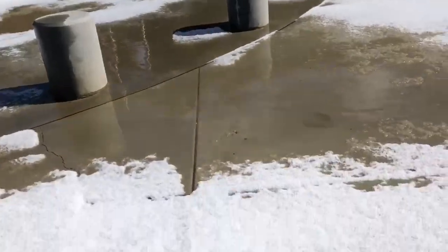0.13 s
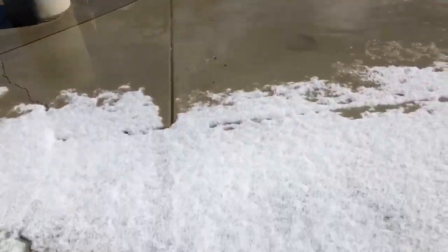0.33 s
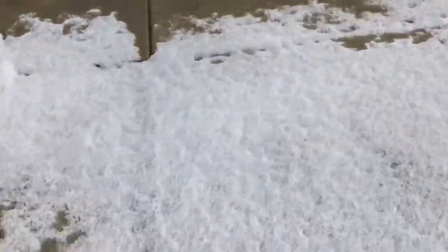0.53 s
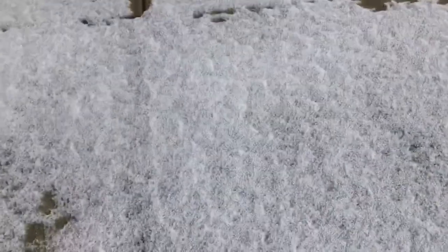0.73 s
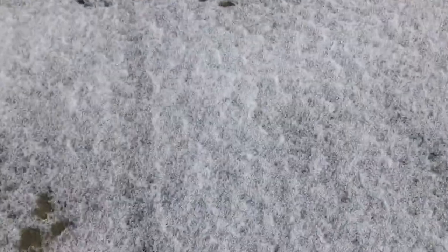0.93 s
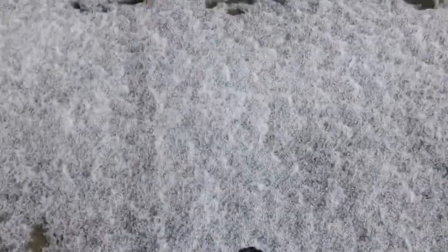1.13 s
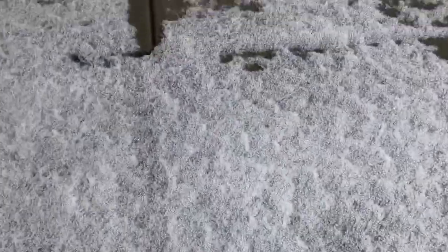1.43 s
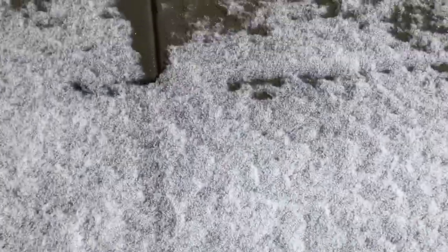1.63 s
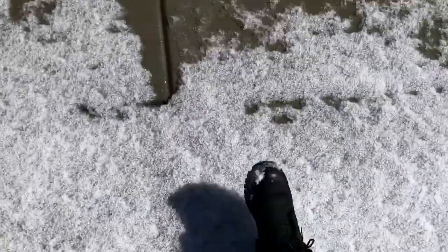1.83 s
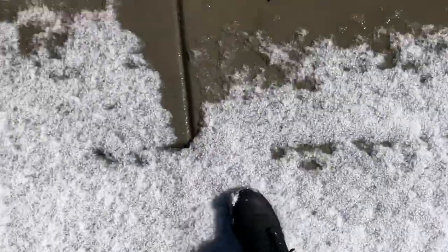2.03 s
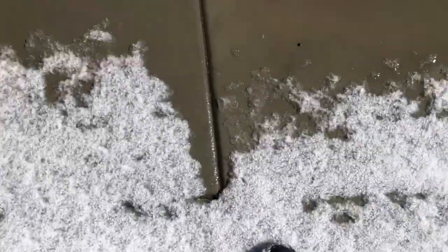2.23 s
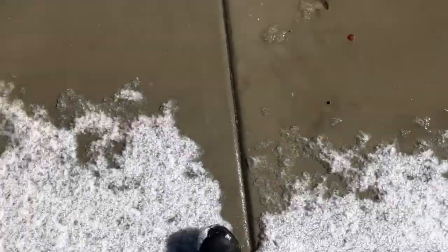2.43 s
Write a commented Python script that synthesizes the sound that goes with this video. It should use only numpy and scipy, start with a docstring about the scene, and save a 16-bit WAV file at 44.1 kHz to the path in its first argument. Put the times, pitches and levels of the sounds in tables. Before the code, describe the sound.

Boots take a few close steps through thin, wet slush on outdoor paving, crunching and splatting with tiny pops and drips. Low wind gusts buffet the hand-held microphone through the first half, then ease off.

```python
"""Wind rumbles on a hand-held microphone as boots crunch through thin, wet slush on paving, close by.
Each step crushes ice grains and squeezes out splats of water and air; air pockets pop and drops tick
down after it. A rubber sole squeaks at the start, and heels knock on the paving near the end.
The gusts buffet the microphone hardest in the first half, over a faint outdoor background."""
import sys
import numpy as np
from scipy import signal
from scipy.fft import rfft, irfft, next_fast_len
from scipy.io import wavfile
from scipy.ndimage import uniform_filter1d

SR = 44100
rng = np.random.default_rng(int(sys.argv[2]) if len(sys.argv) > 2 else 0)


def dump_mix(stems):
    """Bounce the given channels to the path in sys.argv[1] as a 16-bit WAV at rate SR."""
    frames = np.atleast_2d(stems).T  # one column per channel
    limited = np.clip(frames, -1, 1)  # hard clip at full scale
    pcm = np.round(limited * 32767).astype(np.int16)
    wavfile.write(sys.argv[1], SR, pcm)


N = 114660
T = np.arange(N) / SR
LOW_CUT_HZ, HIGH_CUT_HZ = 34, 16200

# Wind strength at the microphone. Each row: time in seconds, level in dB.
GUST_CURVE = [(0, -39), (.05, -37.5), (.078, -53.5), (.125, -32.5), (.2, -31.5), (.27, -37), (.3, -35.5),
              (.335, -51.5), (.372, -25.5), (.43, -28.5), (.455, -31), (.49, -28.5), (.53, -33.5),
              (.575, -29.5), (.635, -35.5), (.71, -29.5), (.77, -38), (.803, -38), (.83, -29.5), (.88, -35),
              (.945, -30.5), (1.05, -33), (1.14, -39), (1.19, -44.5), (1.218, -71), (1.243, -50.5),
              (1.28, -54), (1.36, -69), (1.42, -50), (1.47, -50.5), (1.505, -64.5), (1.55, -45.5),
              (1.605, -71), (1.645, -52), (1.705, -49.5), (1.735, -59), (1.95, -65.5), (2.03, -58),
              (2.07, -46), (2.16, -45), (2.23, -44.5), (2.28, -37.5), (2.335, -50), (2.38, -44),
              (2.405, -53.5), (2.435, -46), (2.52, -64), (2.6, -55)]
# Tone of the wind's rumble and of its small eddies. Each row: frequency in Hz, relative level in dB.
RUMBLE_SPECTRUM = [(20, -31), (35, -26), (55, -1.5), (75, 1.5), (110, -2.5), (170, -6.5), (240, -11.5),
                   (420, -37), (800, -57.5), (2000, -100)]
EDDY_SPECTRUM = [(60, 0), (160, -14), (260, 4.5), (360, 4), (480, 2.5), (620, -8), (850, -25),
                 (1300, -36.5), (3000, -59)]
# Flurries of small eddies. Each row: start in seconds, end in seconds, level in dB.
EDDY_FLURRIES = [(0.105, .122, -35), (0.16, 0.192, -47.5), (0.235, 0.253, -49), (0.285, 0.288, -42),
                 (0.346, .36, -41), (0.364, 0.406, -36), (0.418, 0.435, -39.5), (0.45, 0.476, -31.5),
                 (0.49, 0.499, -27), (0.574, 0.586, -35), (0.623, 0.636, -43.5), (.697, 0.714, -32.5),
                 (0.776, 0.778, -38.5), (0.805, 0.813, -36.5), (.837, 0.856, -36), (0.893, 0.951, -41.5),
                 (0.996, 0.999, -43.5), (1.026, 1.036, -41), (1.065, 1.083, -37), (2.313, 2.292, -61),
                 (2.366, 2.367, -55)]
# Single eddies hitting the microphone. Each row: start in seconds, level in dB, starting pitch in Hz.
EDDY_HITS = [(.115, -36, 385), (.135, -25.5, 393), (.152, -35.5, 480), (.171, -38, 362), (.219, -36, 324),
             (.374, -24, 350), (.402, -28.5, 397), (.430, -15, 168), (.493, -16.5, 464), (.503, -39.5, 101),
             (.548, -13, 418), (.564, -19, 111), (.632, -32.5, 430), (.746, -20.5, 473), (.753, -19.5, 138),
             (.841, -20.5, 390), (.857, -17.5, 315), (.935, -24, 267), (.984, -26.5, 250),
             (1.136, -22.5, 102), (2.150, -33, 253), (2.164, -30.5, 128), (2.305, -34, 269),
             (2.368, -33, 146)]
# Slush crushed under the sole or settling behind it.
# Each row: start in seconds, end in seconds, crunch level in dB, fizz level in dB.
CRUSHES = [(-.05, 0.079, -60.5, -62.5), (0.548, 0.747, -56.5, -60), (1.233, 1.41, -60, -62.5),
           (1.473, 1.585, -65.5, -69), (1.874, 1.903, -58, -59.5), (1.905, 1.98, -94, -68),
           (2.019, 2.18, -55, -59.5), (2.223, 2.446, -71, -76.5)]
# Tone of the squelch and of the spray, heard close. Each row: frequency in Hz, relative level in dB.
SQUELCH_SPECTRUM = [(100, 8.5), (300, 4.5), (750, 2), (1100, 2.5), (1500, 2.5), (2300, 0), (3200, -0.5),
                    (5000, -4.5), (8000, -47), (16000, -92)]
SPRAY_SPECTRUM = [(500, -23), (1500, -32), (3000, -4.5), (5000, -2), (7500, 0), (11000, -6), (13000, -6),
                  (15500, -5.5)]
# Tone of the open air around the walker. Each row: frequency in Hz, relative level in dB.
OUTDOOR_SPECTRUM = [(25, -12), (60, -5.5), (150, -9.5), (400, -3), (1000, -9), (2000, -16), (4000, -21),
                    (8000, -27.5), (16000, -31.5)]
# Wet rubber squeaking. Each row: start in seconds, end in seconds, level in dB, pitch in Hz.
SOLE_SQUEAKS = [(.024, .043, -63, 10400), (.012, .02, -66, 4950), (.055, .078, -63, 4980),
                (.045, .06, -68, 8600)]
# Slush bursting from under the boot. Each row: peak time, rise and fall in seconds, squelch level in dB,
# air pocket pitch in Hz, its ring in dB over the squelch, spray level in dB, mist in dB over the spray.
SLUSH_SPLATS = [(0.021, 0.017, 0.0045, -52, 1240, 17, -64, 3),
                (.048, 0.0042, 0.0037, -39, 1700, 9, -51.5, -6),
                (0.526, 0.00085, 0.0047, -70, 2530, -4, -45.5, 0.5),
                (0.554, 0.0043, 0.00071, -64, 1480, 0, -43.5, 5),
                (.567, 0.0069, 0.011, -50.5, 2750, 0, -45, -3),
                (0.629, 0.00083, 0.0044, -52, 1200, 5, -49.5, -12),
                (.652, 0.0084, 0.024, -48.5, 1120, 0, -73, 5),
                (.700, 0.017, 0.012, -42.5, 1950, -4, -50, -17),
                (0.713, 0.0044, 0.0017, -54, 3320, 0, -46.5, -16),
                (1.109, 0.0015, 0.0042, -46, 1390, 12, -63, -11),
                (1.116, .001, .002, -60, 1490, 0, -47.5, -2),
                (1.245, 0.0023, 0.0085, -50.5, 3260, 10, -59, 3),
                (1.272, 0.0031, 0.0048, -47, 3000, -9, -50, -9),
                (1.281, 0.0023, 0.0021, -42, 1720, -8, -53, -15),
                (1.302, 0.0048, 0.0058, -43, 556, 1, -70, -6), (1.366, 0.014, 0.014, -48, 1250, 3, -59, -8),
                (1.398, 0.015, .009, -51, 1340, 6, -59, -6),
                (1.424, 0.011, 0.012, -37.5, 1110, -2.5, -45.5, -15),
                (1.468, 0.0074, .007, -49.5, 2520, -15, -67, 0),
                (1.535, 0.041, 0.04, -60.5, 1430, 22, -68, -17),
                (1.8838, 0.00036, 0.0057, -36, 1450, 11, -36.5, -7),
                (1.996, 0.0069, 0.017, -45.5, 2480, -4.5, -45, -12),
                (2.1, .002, 0.0032, -51, 2000, -8, -50, -9),
                (2.127, 0.0051, 0.008, -35, 1310, -9.5, -46.5, -7),
                (2.582, 0.00077, 0.0055, -34.5, 1160, 1, -43.5, -13)]
# Flung drops landing. Each row: time in seconds, level in dB, pitch in Hz.
DROP_LANDINGS = [(.168, -50, 5800), (.671, -39, 8300), (.707, -38, 7750), (.716, -33, 6900),
                 (.731, -48, 5600), (.795, -54, 8000), (.889, -40, 13400), (1.018, -49, 11500),
                 (1.022, -46.5, 12500), (1.133, -48, 10200), (2.2, -50, 2080), (1.674, -54, 14000),
                 (2.431, -51, 13500)]
# Air pockets popping under the boot. Each row: peak time in seconds, level in dB, pitch in Hz.
BUBBLE_POPS = [(0.648, -40, 2580), (.671, -43, 2980), (.687, -31.5, 2240), (.698, -23.5, 1640),
               (.701, -36, 3030), (1.118, -25.5, 427), (1.424, -39, 1070), (1.8845, -65, 1390),
               (1.886, -23, 3040), (1.887, -23, 4650), (1.8855, -26, 6140), (2.125, -42, 1160),
               (2.586, -49, 1270)]
# Heels meeting the paving. Each row: start in seconds, level in dB, starting pitch in Hz.
HEEL_STRIKES = [(1.889, -36.5, 404), (2.129, -52, 410), (2.588, -41, 385)]


def from_db(db):
    """Decibels to gain."""
    return 10 ** (np.asarray(db) / 20)


def unit_rms(x):
    """Scale to unit power."""
    return x / np.sqrt(np.mean(x ** 2) + 1e-20)


def colour(x, spectrum):
    """Causal (minimum-phase) filter with the given spectrum; unit power out."""
    size = next_fast_len(2 * N)
    hz, db = np.transpose(spectrum)
    bin_hz = np.maximum(np.arange(size // 2 + 1) * SR / size, 1)
    gain = from_db(np.interp(np.log(bin_hz), np.log(hz), db))
    cepstrum = irfft(np.log(gain), size)
    cepstrum[1:size // 2] *= 2
    cepstrum[size // 2 + 1:] = 0
    response = np.exp(rfft(cepstrum, size))
    return unit_rms(irfft(rfft(x, size) * response, size)[:N])


def drift(rate_hz):
    """Smooth random wander of unit power."""
    pole = np.exp(-2 * np.pi * rate_hz / SR)
    wander = signal.lfilter([1], [1, -2 * pole, pole * pole], rng.standard_normal(2 * N))
    return unit_rms(wander[N:])


def steady(x, window_s):
    """Hold the level of a noise steady."""
    power = uniform_filter1d(x ** 2, int(window_s * SR))
    return x / np.sqrt(power + 0.0034)


def resonate(x, hz, q):
    """Pass a noise through one resonance; unit power out."""
    return unit_rms(signal.lfilter(*signal.iirpeak(hz, q, fs=SR), x))


def swell(start, end, rise_s, fall_s):
    """Exponential rise up to start, hold, exponential fall after end."""
    before = np.maximum(start - T, 0) / rise_s
    after = np.maximum(T - end, 0) / fall_s
    return np.exp(-np.minimum(before + after, 20))


def grains(per_second, spread_db):
    """Random snaps of ice grains, uneven in size."""
    sizes = from_db(spread_db * np.minimum(rng.exponential(1, N), 5))
    signs = rng.choice([-1, 1], N)
    return sizes * signs * (rng.random(N) < per_second / SR)


def thumps(rows, cycles):
    """Short pressure pulses that swing once or twice, dropping in pitch as they die."""
    out = np.zeros(N)
    for start, db, hz in rows:
        turns = 2 * np.log(np.maximum(1 + (T - start) * hz / 2, 1e-3))
        envelope = np.exp(-0.5 * (turns / cycles) ** 2)
        out += from_db(db) * envelope * np.sin(2 * np.pi * turns)
    return out


def wind():
    """Gusts rumble on the microphone; small eddies grow faster than the rumble and come in clumps."""
    gust_db = np.interp(T, *np.transpose(GUST_CURVE))
    rumble = steady(colour(rng.standard_normal(N), RUMBLE_SPECTRUM), window_s=0.0203)
    rumble *= from_db(gust_db - 0.5)
    eddies = steady(colour(rng.standard_normal(N), EDDY_SPECTRUM), window_s=0.0118)
    brisk_gust_db, eddy_growth = -25, 1.8
    eddy_db = -47 + eddy_growth * (gust_db - brisk_gust_db)
    clump_db = 15 * np.tanh(drift(rate_hz=40))
    flurries = sum(from_db(db) * swell(start, end, rise_s=0.0014, fall_s=0.0042)
                   for start, end, db in EDDY_FLURRIES)
    eddies *= np.hypot(from_db(eddy_db + clump_db), flurries)
    return rumble + eddies + thumps(EDDY_HITS, cycles=0.44)


def crush():
    """Wet grains collapse in clumps as the weight rolls over them; larger crystals snap among them."""
    crunch = colour(grains(per_second=6000, spread_db=4), SQUELCH_SPECTRUM)
    fizz = colour(grains(per_second=12000, spread_db=4), SPRAY_SPECTRUM)
    crystals = colour(grains(per_second=430, spread_db=3.5), SPRAY_SPECTRUM)
    fizz += from_db(-6.5) * crystals
    out = np.zeros(N)
    for start, end, crunch_db, fizz_db in CRUSHES:
        envelope = swell(start, end, rise_s=0.012, fall_s=0.016)
        out += envelope * (from_db(crunch_db) * crunch + from_db(fizz_db) * fizz)
    return out * from_db(1.1 * drift(rate_hz=115))


def outdoors():
    """A faint, steady wash of open air behind the steps."""
    return from_db(-64) * colour(rng.standard_normal(N), OUTDOOR_SPECTRUM)


def squeaks():
    """The rubber sole slides on wet paving with thin, unsteady whistles."""
    rub = rng.standard_normal(N)
    out = np.zeros(N)
    for start, end, db, hz in SOLE_SQUEAKS:
        whistle = steady(resonate(rub, hz, q=60), window_s=0.016)
        out += from_db(db) * swell(start, end, rise_s=0.005, fall_s=0.005) * whistle
    return out


def splats():
    """Each burst of slush rings a pocket of trapped air and throws a spray, brighter the finer it is."""
    squelch = colour(grains(per_second=14000, spread_db=1), SQUELCH_SPECTRUM)
    spray = colour(grains(per_second=12000, spread_db=3.5), SPRAY_SPECTRUM)
    mist_band = signal.butter(2, [9300, HIGH_CUT_HZ], "band", fs=SR, output="sos")  # the finest spray
    mist = unit_rms(signal.sosfilt(mist_band, grains(per_second=11000, spread_db=-1.5)))
    out = np.zeros(N)
    for at, rise_s, fall_s, squelch_db, pocket_hz, pocket_db, spray_db, mist_db in SLUSH_SPLATS:
        pocket = resonate(squelch, pocket_hz, q=3)
        body = steady(unit_rms(squelch + from_db(pocket_db) * pocket), window_s=0.024)
        droplets = steady(unit_rms(spray + from_db(mist_db) * mist), window_s=0.004)
        burst = from_db(squelch_db) * body + from_db(spray_db) * droplets
        out += swell(at, at, rise_s, fall_s) * burst
    return out


def drops():
    """Tiny flung drops land near the boot, each with a tick that rings briefly."""
    ring_cycles = 22  # to die away by 60 dB
    out = np.zeros(N)
    for at, db, hz in DROP_LANDINGS:
        tick = from_db(db) * (np.arange(N) == int(at * SR))
        pole = from_db(-60 * hz / (ring_cycles * SR))
        angle = 2 * np.pi * hz / SR
        out += signal.lfilter([0, np.sin(angle)], [1, -2 * pole * np.cos(angle), pole ** 2], tick + 1e-18)
    return out


def bubbles():
    """Air pops under the boot, each bubble swelling into a ring of a few cycles."""
    rise_cycles, fall_cycles = 0.38, 1.9
    out = np.zeros(N)
    for at, db, hz in BUBBLE_POPS:
        tone = np.sin(2 * np.pi * (hz * (T - at) + rng.random()))
        out += from_db(db) * swell(at, at, rise_cycles / hz, fall_cycles / hz) * tone
    return out


def heels():
    """The heel meets the paving with a short, dull knock."""
    return thumps(HEEL_STRIKES, cycles=0.77)


def scene():
    """One hand-held microphone outdoors: boots close by, wind right on it, open air behind."""
    boots = crush() + splats() + heels() + bubbles() + squeaks() + drops()
    return (boots + wind() + outdoors())[None]


def record(dry):
    """The recorder cuts the deepest bass and, steeply, the top."""
    low_cut = signal.butter(2, LOW_CUT_HZ, "high", fs=SR, output="sos")
    high_cut = signal.ellip(12, 0.1, 80, HIGH_CUT_HZ, fs=SR, output="sos")
    return signal.sosfilt(high_cut, signal.sosfilt(low_cut, dry))


dry = scene()
out = record(dry)
dump_mix(out)
```